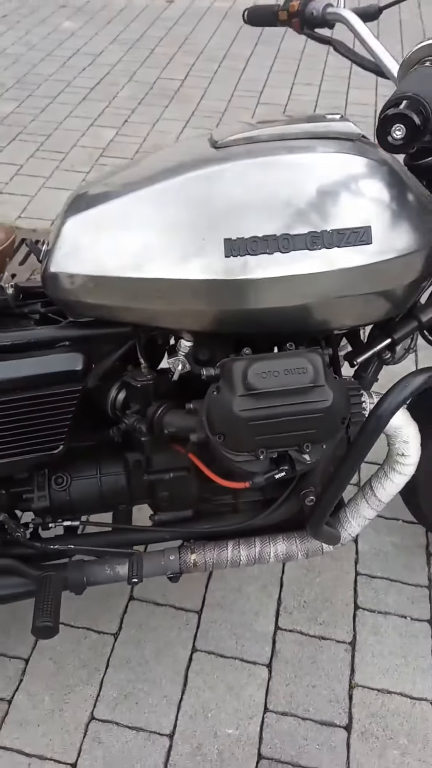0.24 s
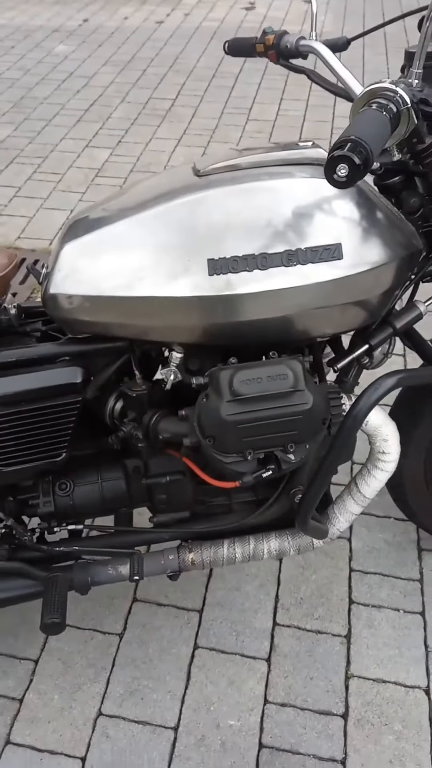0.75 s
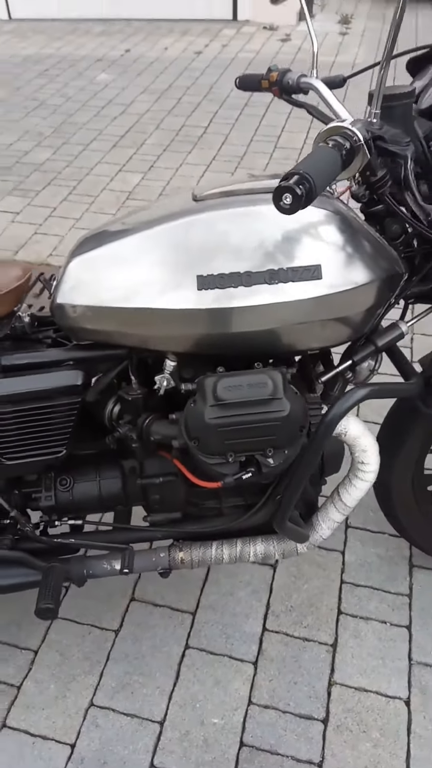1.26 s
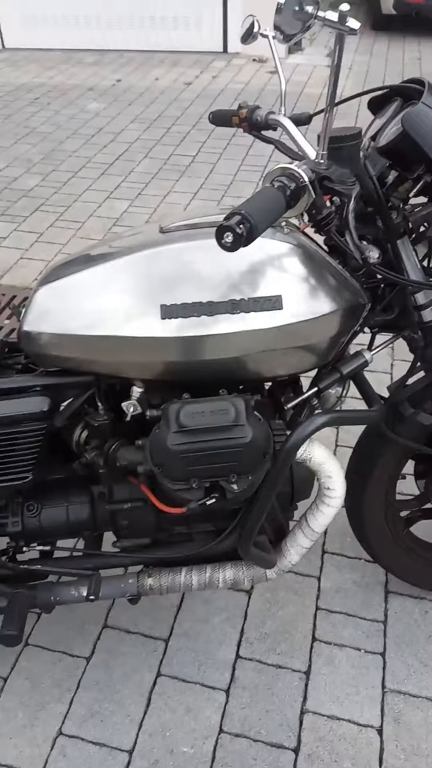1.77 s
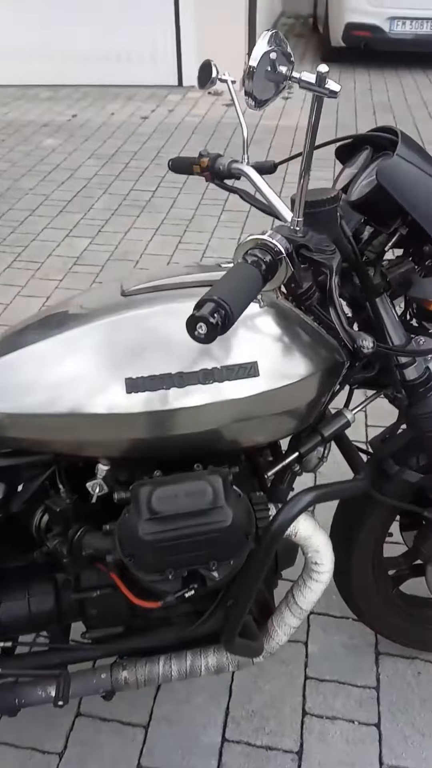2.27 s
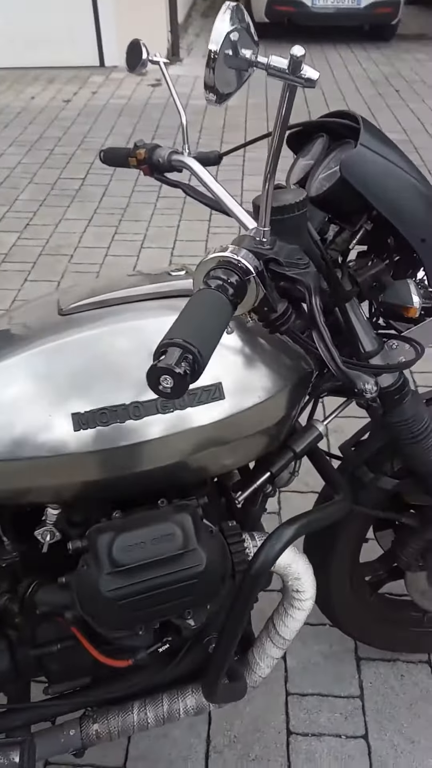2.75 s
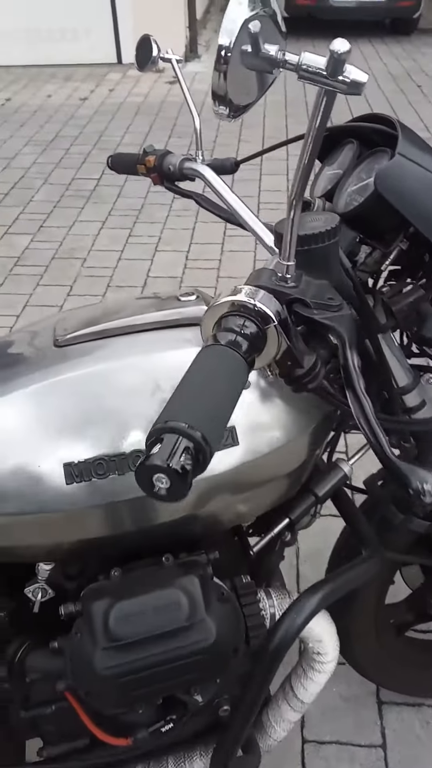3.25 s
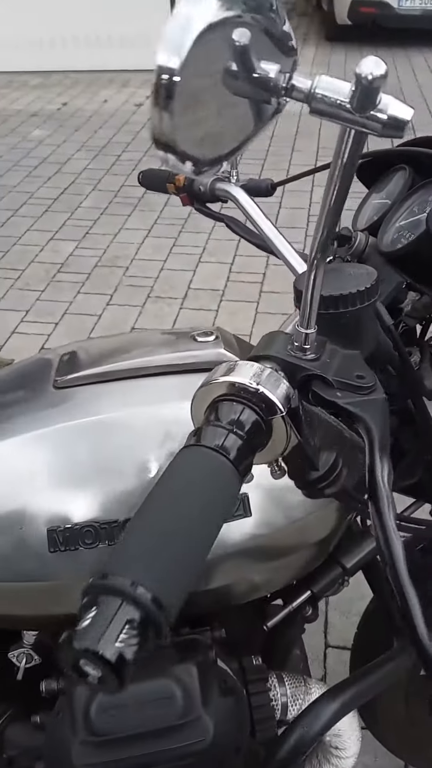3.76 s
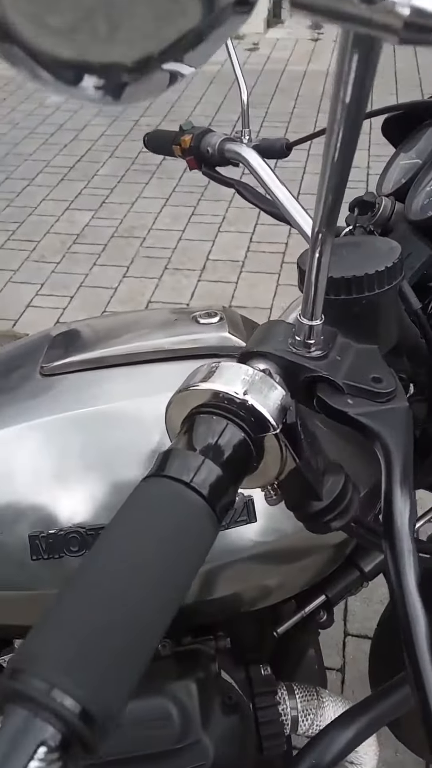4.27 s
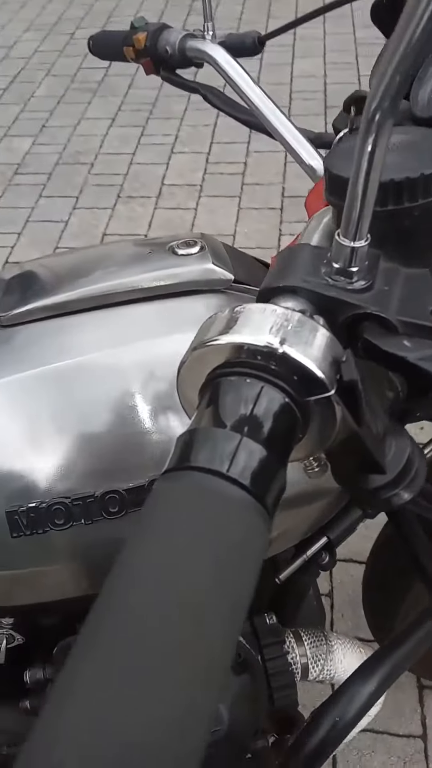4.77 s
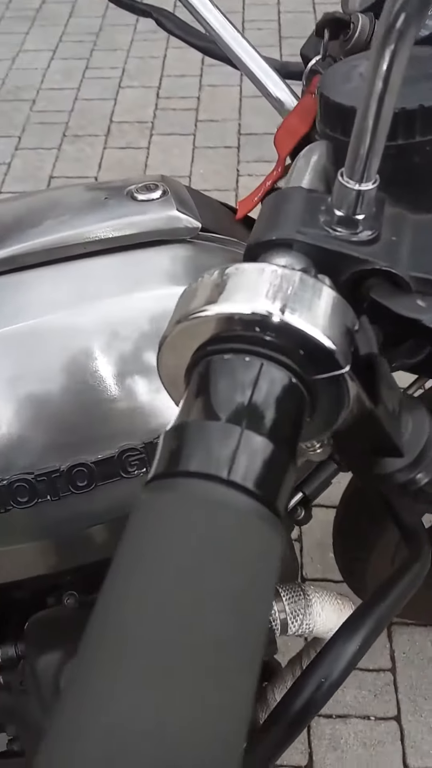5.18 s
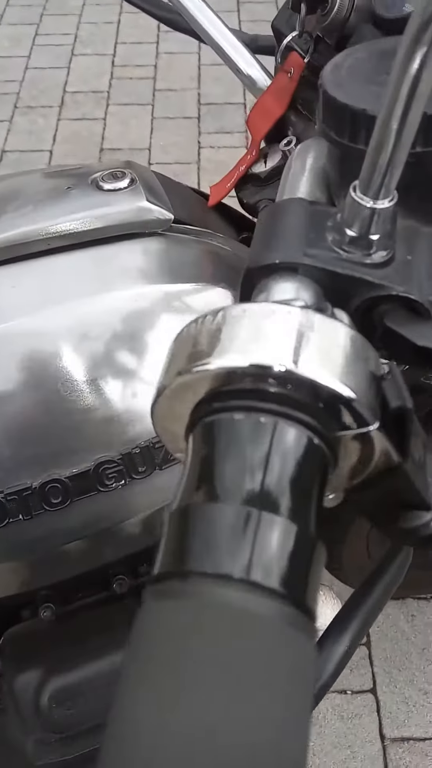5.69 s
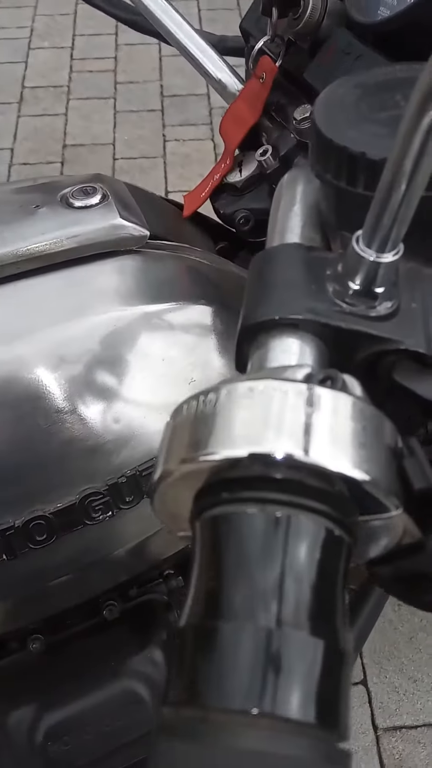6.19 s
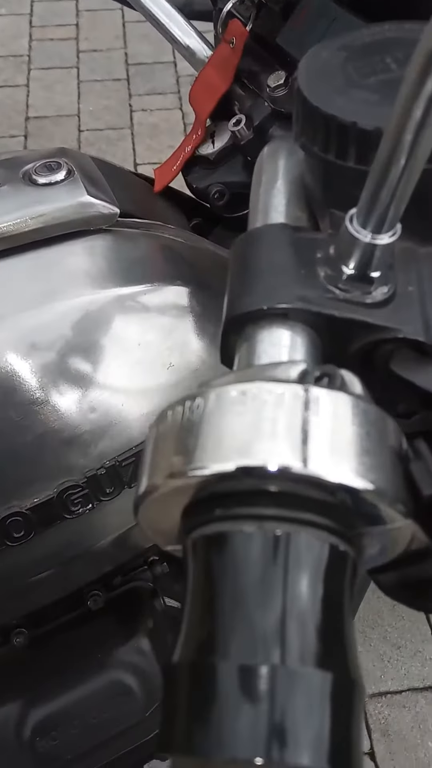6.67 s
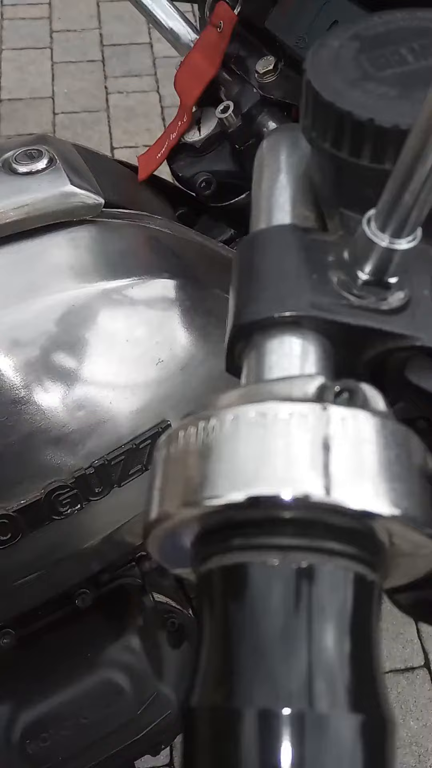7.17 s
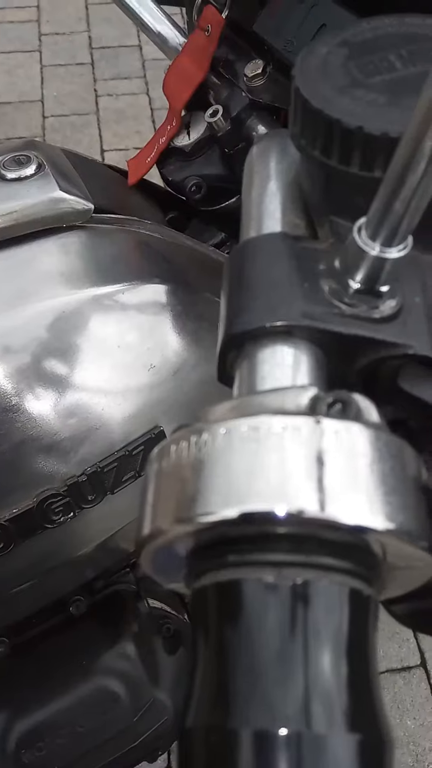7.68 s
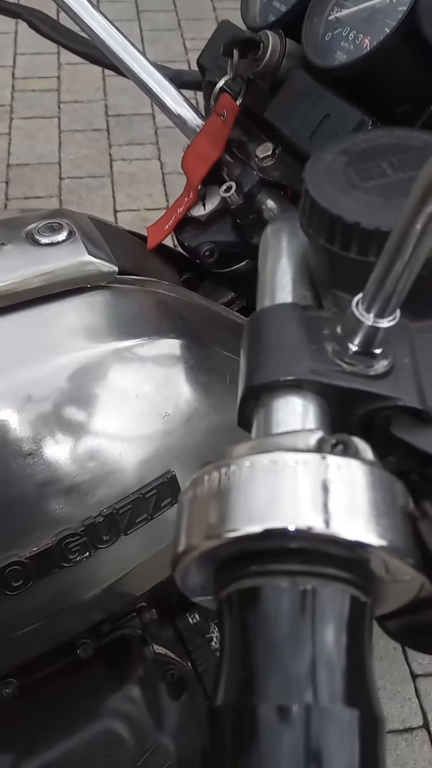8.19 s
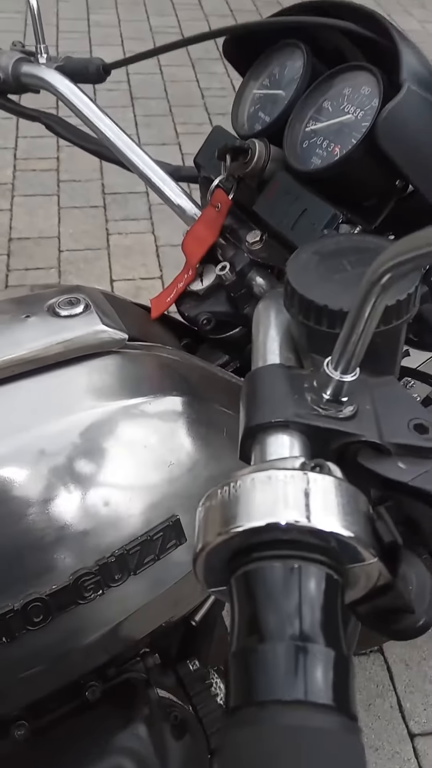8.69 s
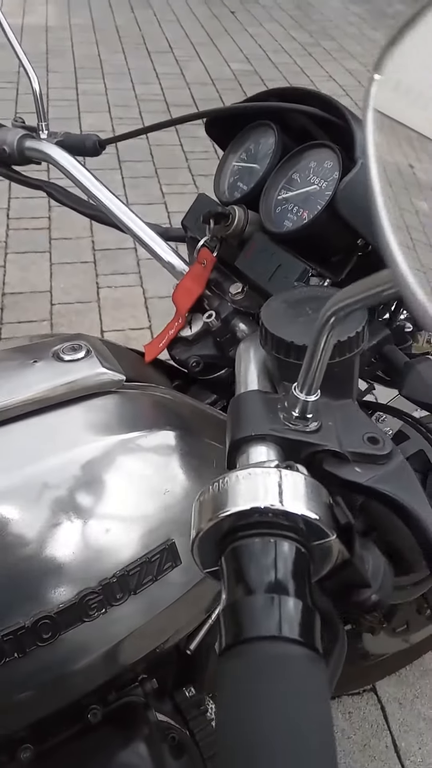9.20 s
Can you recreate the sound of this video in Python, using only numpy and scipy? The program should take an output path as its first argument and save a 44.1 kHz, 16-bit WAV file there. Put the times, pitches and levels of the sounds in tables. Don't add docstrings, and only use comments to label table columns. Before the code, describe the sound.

Close, dry idle of a large motorcycle engine: lumpy paired exhaust thuds, airy intake sucking, metallic valve taps, and occasional soft gusts over the microphone.

```python
import sys
import numpy as np
from scipy import signal
from scipy.fft import rfft, irfft, next_fast_len
from scipy.io import wavfile
from scipy.ndimage import uniform_filter1d

SR = 44100
rng = np.random.default_rng(int(sys.argv[2]) if len(sys.argv) > 2 else 0)


def put_to_file(sound):
    columns = np.atleast_2d(sound).T
    safe = np.clip(columns, -1, 1)
    whole_steps = np.round(safe * 32767)
    wavfile.write(sys.argv[1], SR, whole_steps.astype(np.int16))


def voltage_ratio(decibels):
    exponent = np.asarray(decibels, float) / 20
    return 10 ** exponent


N = 416304
PAD = SR // 4
TIME = np.arange(N) / SR
ABOVE, AIM, NEARNESS = 1, 2, 3

# (time [s], engine cycles done [count])
CRANK = [(-0.0898, 0), (0.7611, 5), (0.9502, 6), (2.1595, 13), (2.3406, 14), (3.1839, 19), (3.36, 20),
         (3.5481, 21), (3.9096, 23), (4.8522, 28), (5.4535, 31), (6.0182, 34), (6.7332, 38), (7.0845, 40),
         (7.8079, 44), (8.6522, 49), (9.1943, 52), (9.5339, 54)]


def read(points, hz):
    f, value = np.transpose(points)
    return np.interp(np.log(hz + 1), np.log(f + 1), value)


def add(mix, s, sound):
    part = mix[..., round(s * SR) + PAD:][..., :sound.shape[-1]]
    part += sound[..., :part.shape[-1]]


def noise(spectrum, size, patchy_db):
    # (frequency [Hz], left-right coherence [-1 to 1])
    likeness = [(60, 1), (200, 0.96), (500, 0.88), (1200, 0.5), (3000, 0.64), (7000, 0.61), (15000, 0.53)]
    # (frequency [Hz], lead of the left [rad])
    left_lead = [(0, 2), (690, -0.7), (1720, 0.84), (2500, 0.9), (2840, -1.56), (3960, -4.5), (4820, -5),
                 (5250, -9.5), (6460, -8.5), (7060, -12.5), (8790, -10), (10600, -16.5), (11500, -36),
                 (15200, -13)]
    frames = 4 * N // size + 5
    hz = np.fft.rfftfreq(size, 1 / SR)
    a, b, c, d, patches = rng.standard_normal((frames, len(hz), 5), dtype=np.float32).T
    patches = uniform_filter1d(uniform_filter1d(patches, size=3, axis=0), size=9, axis=1)
    same = np.clip(read(likeness, hz), -1, 1)[:, None].astype(np.float32)
    late = np.exp(-1j * read(left_lead, hz))[:, None].astype(np.complex64)
    left = a + 1j * b
    right = same * late * left + np.sqrt(1 - same ** 2) * (c + 1j * d)
    z = np.array([left, right])
    z *= voltage_ratio(read(spectrum, hz)[:, None] + patchy_db * patches / patches.std())
    return signal.istft(z, nperseg=size, noverlap=size * 3 // 4)[1][:, :N] / np.sqrt(size / 2)


def resonances(x, peaks):
    return x + sum(voltage_ratio(db) * signal.lfilter(*signal.iirpeak(hz, hz / width, SR), x) for hz, width, db in peaks)


def camera(column, s=TIME):
    # (time [s], share above the tank [0-1], aim at the intake [dB], nearness to the pipes [dB])
    camera_path = np.array([(0, 0.44, 2.5, 8), (.75, 0.03, 0, 10), (1.3, 0, 0.5, 8.5), (2.2, 0, -1, 7),
                            (3.2, 0.38, -2.5, 7), (3.75, 0.7, -2.5, 5), (4.3, 0.65, -3, 8.5),
                            (4.8, 0.97, -3, 5.5), (5.5, 1, -1, 4.5), (6.2, 0.88, -1.5, 5.5),
                            (7, 1, -3.5, 4), (8.3, 1, -2, 5), (9.44, 0.67, -1.5, 4)])
    return np.interp(s, camera_path[:, 0], camera_path[:, column])


def turns():
    return np.interp(TIME, *np.transpose(CRANK))


def cycles():
    # (time [s], level over an ordinary beat [dB])
    burns = [(.48, -1.4), (.65, -0.7), (1.01, 1), (1.36, -4.5), (1.53, 1.7), (2.05, 0.9), (2.22, -3.4),
             (2.57, -1.5), (2.74, -0.7), (2.91, 0), (3.07, -3.4), (3.43, -1.4), (3.62, 1), (4.17, 1.2),
             (4.73, 0.5), (5.52, -2.5), (5.71, 1.5), (6.26, -0.8), (6.8, 0.3), (7.87, 2.8), (8.04, -2.8),
             (8.21, 0.8), (8.72, -2.5), (9.08, 1.8), (9.42, -3)]
    s, done = np.transpose(CRANK)
    start = np.interp(np.arange(done[-1] + 1), done, s)
    burn_s, burn_db = np.transpose(burns)
    burn = np.zeros(len(start))
    burn[np.searchsorted(start, burn_s) - 1] = burn_db
    return start, np.diff(start, append=2 * start[-1] - start[-2]), burn


def breeze():
    # (frequency [Hz], level [dB])
    buffet = [(100, -31), (200, -5), (300, -0.3), (450, 1), (700, -5.5), (1200, -14)]
    # (time [s], half length [s], level [dB])
    gusts = [
        (0.453, 0.35, 9),
        (1.843, 0.36, 7),
        (3.2, 0.28, 3.5),
        (4.35, 0.29, 5.5),
        (5.05, 0.16, -19),
        (6.097, 0.058, 6),
        (6.763, 0.092, 4.5),
        (8.2, .3, 4),
    ]
    gusts_db = sum(db * np.exp(-((TIME - s) / half) ** 2) for s, half, db in gusts)
    steady_db = -24 + 0.15 * camera(NEARNESS)
    return voltage_ratio(steady_db + gusts_db) * noise(buffet, size=512, patchy_db=3.0)


def valves():
    # (frequency [Hz], level [dB])
    clatter = [(300, -1), (900, 2), (1500, 0), (3000, 1.5), (6500, 2.5), (9000, -4.5), (15000, -3)]
    # (frequency [Hz], width [Hz], level [dB])
    cases = [(369, 35, 0.5), (634, 63, 4.5), (776, 81, -4.5), (1037, 53, -2.5), (3245, 20, 5.5),
             (4680, 24, -33)]
    valve_set = [
        (.03, -39.5, 0.0092, [(1440, 12, 0.022), (1800, 4, .04), (2470, -4, 0.062), (2900, 6.5, 0.059), (900, -41, 0.036)]),
        (.295, -25.5, 0.0058, [(5070, -19, 0.024), (5140, -11, 0.056), (5730, 2.5, 0.071), (6980, -2, 0.043), (2450, -52, 0.027)]),
        (.59, -48, 0.0047, [(5850, -20, 0.057), (7250, -0.2, 0.025), (9600, -0.3, .03), (2010, 23, 0.019)]),
        (.664, -34, 0.011, [(3976, 6, 0.08), (4580, 8.5, 0.027), (3400, -11.5, 0.061), (5220, 6.5, 0.055), (6350, -6, 0.037), (1260, -20, .04), (2510, -18, 0.028), (11700, -1, .03)]),
    ]
    # (usual [dB], spread [dB], gain for each dB of aim [dB])
    lash = [
        (-1, 2.5, .3),
        (-4.5, 2, 0.1),
        (-5, 4, .3),
        (0, 1.5, 0.1),
    ]
    # (time [s], closing force in place of the usual one [dB])
    slaps = [
        (1.004, 3),
        (2.394, 5.5),
        (2.728, 3),
        (3.237, 1),
        (4.343, -1),
        (6.074, 4),
        (7.502, 3),
    ]
    out = np.zeros((2, N + 2 * PAD))
    starts, lengths, _ = cycles()
    t = np.arange(1300) / SR
    slap_s, slap_db = np.transpose(slaps)
    for (share, level_db, rattle, modes), (usual_db, spread_db, aimed) in zip(valve_set, lash):
        hz, db, t60 = np.transpose(modes)[..., None]
        for s in starts + share * lengths:
            luck = rng.standard_normal((4, 1300))
            hard = abs(slap_s - s) < .012
            if hard.any():
                force_db = slap_db[hard].sum()
                strike_s = slap_s[hard][0] - .001
            else:
                softer = (abs(luck[3, -1]) - .8) * 3.1
                force_db = usual_db - spread_db * softer + aimed * camera(AIM, s=s)
                strike_s = s + .0006 * luck[0, 0]
            burst = (luck[0] + 0.91 * luck[1:3]) * np.exp(-t / rattle) * np.minimum(t / 0.0018, 1)
            tuned = hz * (1 + 0.012 * luck[3, :len(modes), None])
            decay = voltage_ratio(db - 60 * t / np.minimum(.36 * t60, .02))
            ring = (decay * np.sin(2 * np.pi * tuned * t)).sum(0)
            knock = signal.fftconvolve(burst, ring[None] / 4.5, axes=1)[:, :1300] + voltage_ratio(6) * burst
            add(out, strike_s, voltage_ratio(level_db + force_db) * knock)
    gears = resonances(noise(clatter, size=512, patchy_db=3.0), cases)
    return out[:, PAD:PAD + N] + voltage_ratio(-24) * gears


def intake():
    # (share of the cycle [0-1], level [dB])
    suction = [(0, -2.5), (.06, -3), (.12, -13.5), (.2, -27.5), (.26, -4), (.31, -4.5), (.4, -7),
               (.56, -4.5), (.61, 0.5), (.66, 0), (.7, 3.5), (.95, 1.6), (1, 3.5)]
    # (frequency [Hz], level [dB])
    hiss = [(300, -15), (900, -3), (1500, -2.5), (4000, 1.2), (9000, 4.5), (15000, 10)]
    # (frequency [Hz], width [Hz], level [dB])
    side_on = [(2000, 330, -1), (2650, 60, -12), (3360, 650, -6), (5820, 320, 10), (4840, 77, 8),
               (6490, 89, 6.5)]
    # (frequency [Hz], width [Hz], level [dB])
    overhead = [(642, 55, 7.7), (773, 67, 7.9), (1360, 36, 10.7), (1800, 158, 12.1), (2180, 250, 5.9),
                (2495, 15, 13), (2900, 12, 11), (4020, 37, 4), (4960, 156, 2.9), (5504, 290, 9.7),
                (6460, 78, 2.1), (7140, 30, 1)]
    far_stroke = (.28, .6)
    far_bright_db, far_hidden = 2.0, 0.32
    cycle = turns()
    share, db = np.transpose(suction)
    start, _, burn = cycles()
    over = camera(ABOVE, s=start)
    far_pull = -0.05 - 0.71 * burn + 0.7 * over
    near_pull = -2 + 1.5 * over
    pulls = np.c_[far_pull, near_pull]
    pulls = pulls + 0.28 * rng.standard_normal(pulls.shape)
    pull_cycles = (np.arange(len(start))[:, None] + [.45, .85]).ravel()
    pull_db = np.interp(cycle, pull_cycles, pulls.ravel())
    eddies = uniform_filter1d(rng.standard_normal(N), size=150)
    flow_db = np.interp(cycle % 1, share, db) + pull_db + 0.59 * eddies / eddies.std()
    air = noise(hiss, size=256, patchy_db=2.5) * voltage_ratio(flow_db)
    highpass = signal.firwin(65, 8500, pass_zero=False, fs=SR)
    treble = signal.oaconvolve(air, highpass[None], "same", axes=1)
    far_open = 1. * (cycle % 1 > far_stroke[0]) * (cycle % 1 < far_stroke[1])
    far = uniform_filter1d(far_open, size=300)
    above = np.clip(camera(ABOVE) * (1 - far_hidden * far), 0, 1)
    heard = (1 - above) * resonances(air, side_on) + above * resonances(air, overhead)
    brightness = voltage_ratio(camera(AIM) + far_bright_db * far) - 1
    return voltage_ratio(-22) * (heard + brightness * treble)


def beat(pipe, db, luck):
    start_hz, rise_hz, bend, lead, blow, blow_db, ring_db, t60, over_db = pipe
    t = np.arange(-lead, .12, 1 / SR)
    late = np.maximum(t, 0)
    climb = rise_hz * (1 + .16 * luck[1]) * np.minimum(late / .05, 1) ** bend
    hz = start_hz * (1 + .012 * luck[0]) + climb
    phase = 2 * np.pi * (np.cumsum(hz) - hz[0] * lead * SR) / SR
    blown = voltage_ratio(blow_db + 1.4 * db) * np.exp(-((t - .0098) / blow) ** 2)
    ringing = voltage_ratio(ring_db + .8 * db + 1.3 * luck[2] - 60 * late / t60)
    crack = voltage_ratio(over_db + 1.5 * luck[3] - 60 * late / .035) * np.cos(2.4 * phase)
    shove = -voltage_ratio(db - 24 - 60 * late / .08) * np.sin(.62 * phase)
    swell = np.sin(np.pi / 2 * np.clip((t + lead) / (1.3 * lead), 0, 1))
    fade = np.clip((.1 - t) / .05, 0, 1)
    return swell * ((blown + ringing) * np.cos(phase) + crack + shove) * fade


def exhaust():
    # (start [Hz], rise in 50 ms [Hz], bend of the rise [exponent], lead [s], blow [s], blow level [dB],
    #  ring level [dB], ring T60 [s], overtone level [dB])
    pipes = [
        (83, 44, 1.7, .0025, .0145, -15.5, -16.5, .27, -19.5),
        (93, 39, 1.05, .006, .0125, -14.3, -17.3, .28, -40),
    ]
    # (frequency [Hz], level [dB])
    rumble = [(20, 2), (28, -6), (38, -24), (65, -.5), (110, -6.5), (150, -7.5), (200, -10), (300, -19),
              (500, -38)]
    slow_db_per_s, beat_spread_db = -25, .4
    start, length, burn = cycles()
    gaps = -.0041 + .308 * length + .078 * np.roll(length, 1)
    gaps = gaps + .00045 * burn - .0002 * np.roll(burn, 1)
    out = np.zeros(N + 2 * PAD)
    lucks = rng.standard_normal((len(start), 12))
    t = np.arange(-.012, .012, 1 / SR)
    for s, span, gap, second_db, luck in zip(start, length, gaps, burn, lucks):
        first_db = slow_db_per_s * (span - length.mean())
        add(out, s - pipes[0][3], beat(pipes[0], first_db + beat_spread_db * luck[10], luck[:4]))
        add(out, s + gap - pipes[1][3], beat(pipes[1], second_db + beat_spread_db * luck[11], luck[4:8]))
        gulp = voltage_ratio(-22 + 1.6 * luck[8]) * np.cos(2 * np.pi * 112 * t) * np.exp(-(t / .006) ** 2)
        add(out, s + (0.82 + 0.0058 * luck[9]) * span + t[0], gulp)
    side_lag, above_lag = .00015, -0.00018
    lag = SR * (side_lag + (above_lag - side_lag) * camera(ABOVE))
    left = np.interp(PAD + np.arange(N) - lag, np.arange(len(out)), out)
    ports = np.array([left, out[PAD:PAD + N]])
    return ports + voltage_ratio(camera(NEARNESS) - 6.5) * noise(rumble, size=4096, patchy_db=1.0)


def scene():
    dip_hz, dip_width_hz, dip_share = 3465, 167, 0.24
    metal = intake() + valves()
    above = np.clip(camera(ABOVE), 0, 1)
    reflected = signal.lfilter(*signal.iirpeak(dip_hz, dip_hz / dip_width_hz, SR), metal)
    return voltage_ratio(1.5) * exhaust() + metal - dip_share * above * reflected + breeze()


def roll_off(x):
    return signal.sosfilt(signal.butter(12, 15710, fs=SR, output="sos"), x)


def record(dry):
    # (frequency [Hz], level [dB])
    left_port = [(300, -3), (1200, -7.5), (2000, -8.5), (3500, -12), (5000, -12), (6100, -16), (6550, -1),
                 (7300, -10), (8200, -9), (9700, -28), (11000, -24), (13900, -54), (15000, -19),
                 (15500, -26)]
    # (frequency [Hz], level [dB])
    right_port = [(300, -1), (1200, -9), (3000, -5.5), (4200, -7), (5300, -1.5), (6000, -1), (6550, 3),
                  (7300, -11.5), (8700, -13), (9700, -13.5), (11000, -23), (13000, -18), (14000, -23),
                  (15200, -22.5)]
    size = next_fast_len(N, True)
    hz = np.fft.rfftfreq(size, 1 / SR)
    limits = hz ** 2 / (hz ** 2 + 22 ** 2) * np.clip((15720 - hz) / 250, 0, 1)
    colour = voltage_ratio([read(left_port, hz), read(right_port, hz)]) * limits
    mix = irfft(rfft(dry, size) * colour, size)[:, :N]
    return roll_off(mix)


dry = scene()
out = record(dry)
put_to_file(out)
```